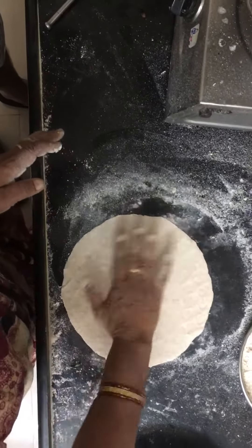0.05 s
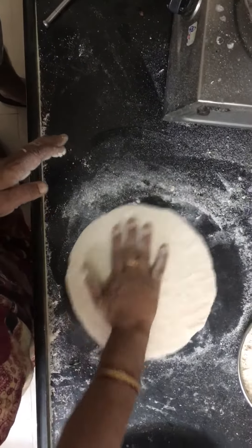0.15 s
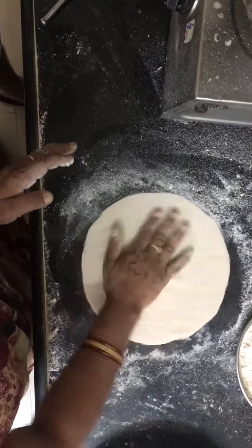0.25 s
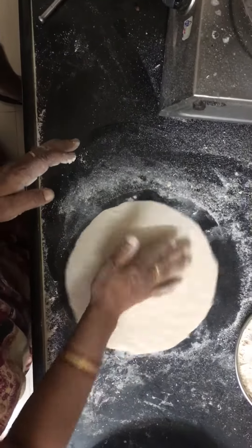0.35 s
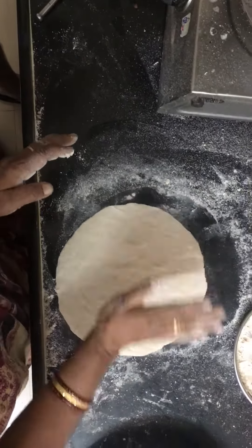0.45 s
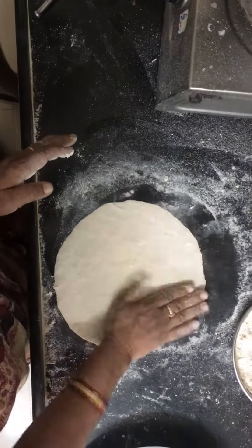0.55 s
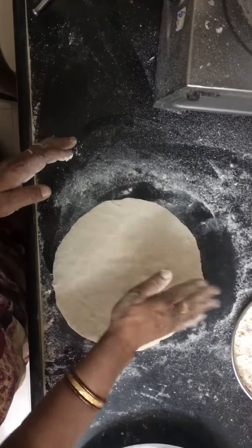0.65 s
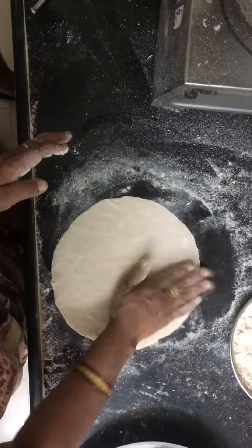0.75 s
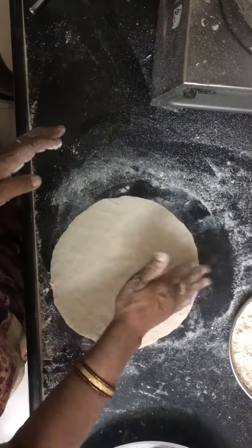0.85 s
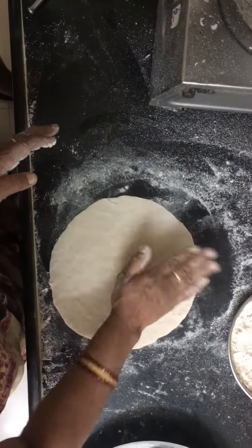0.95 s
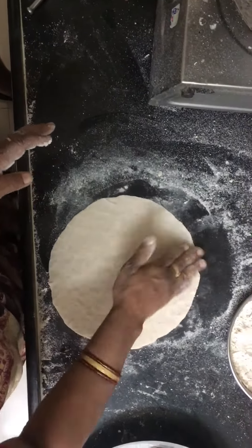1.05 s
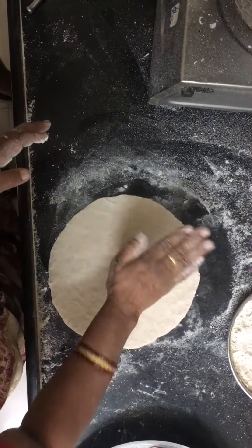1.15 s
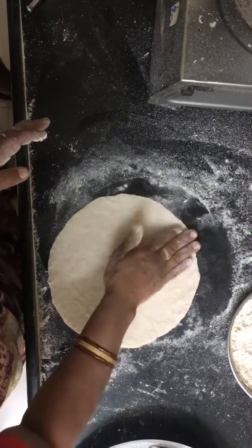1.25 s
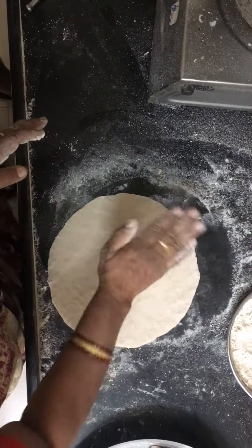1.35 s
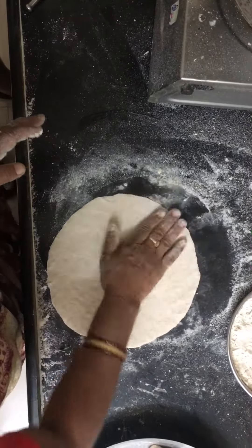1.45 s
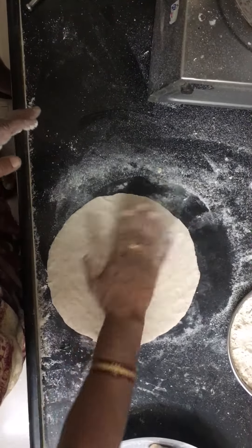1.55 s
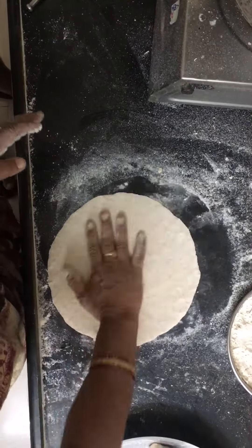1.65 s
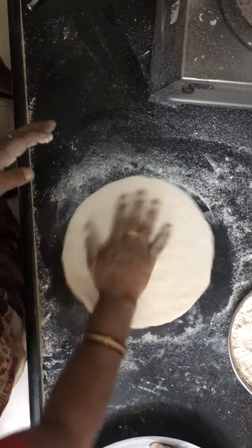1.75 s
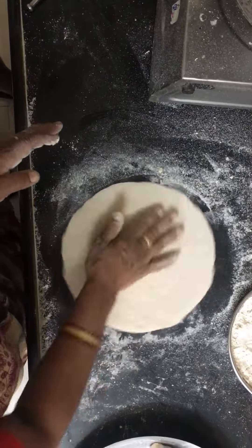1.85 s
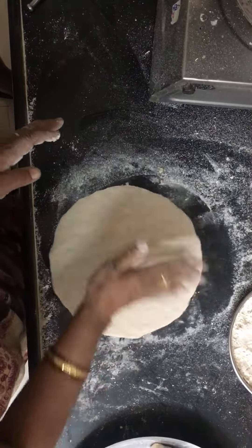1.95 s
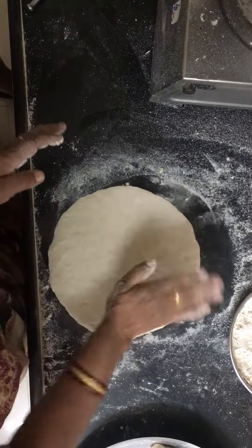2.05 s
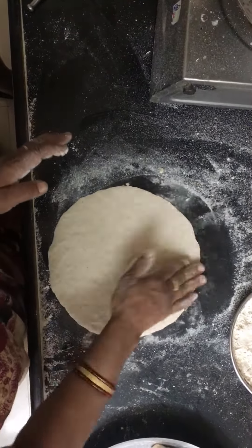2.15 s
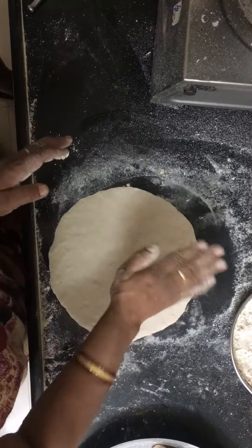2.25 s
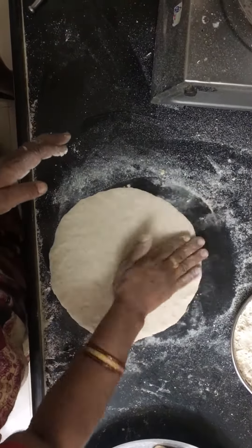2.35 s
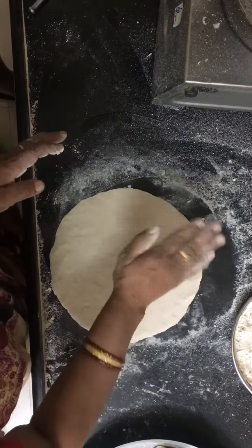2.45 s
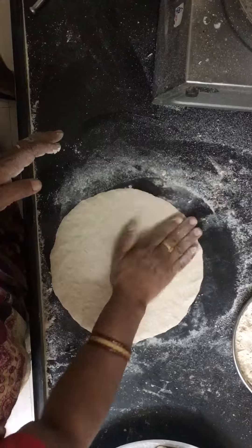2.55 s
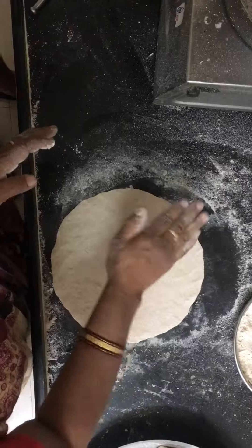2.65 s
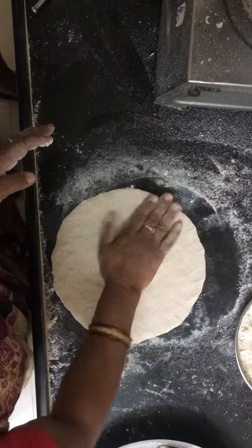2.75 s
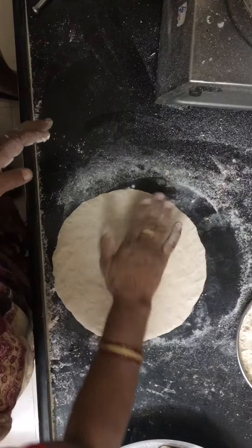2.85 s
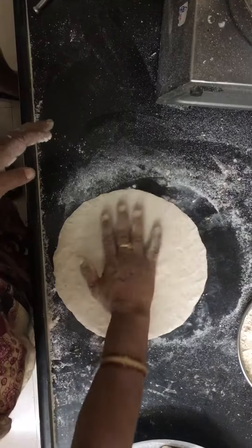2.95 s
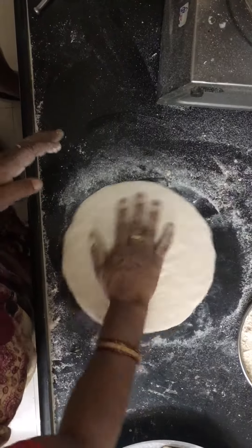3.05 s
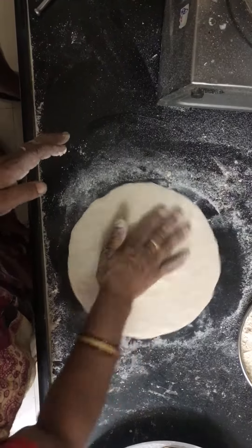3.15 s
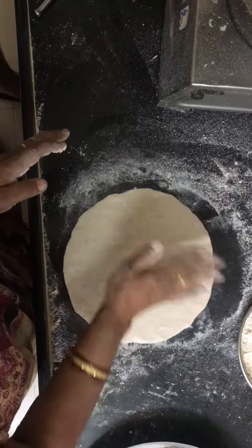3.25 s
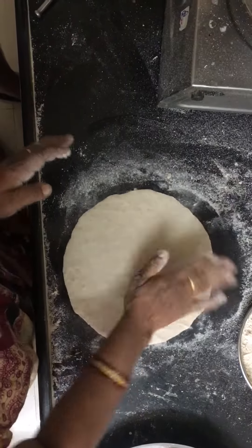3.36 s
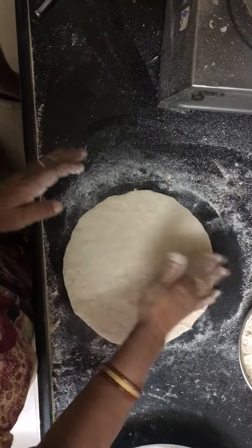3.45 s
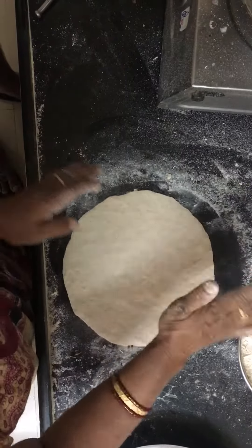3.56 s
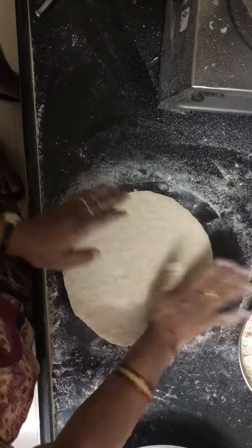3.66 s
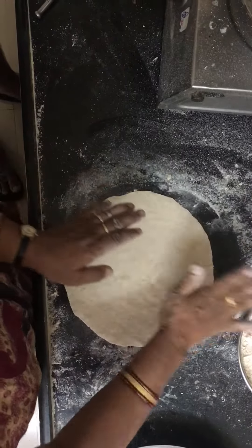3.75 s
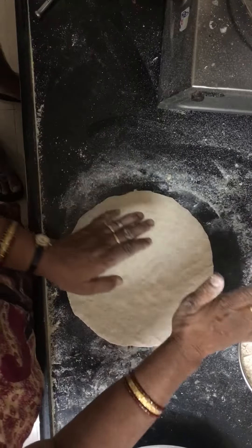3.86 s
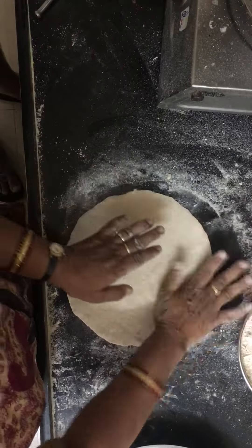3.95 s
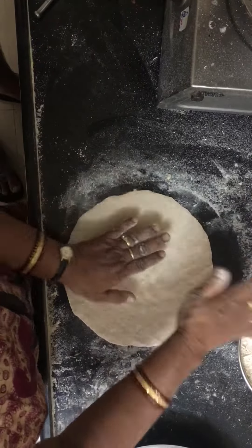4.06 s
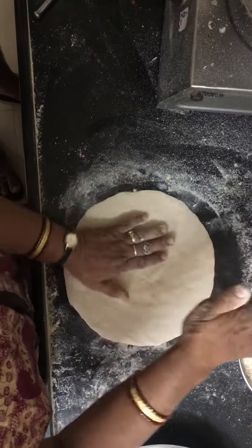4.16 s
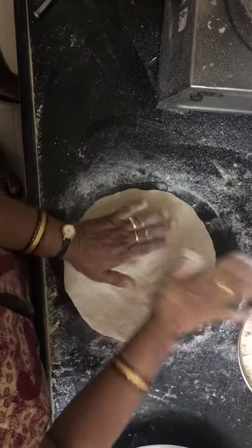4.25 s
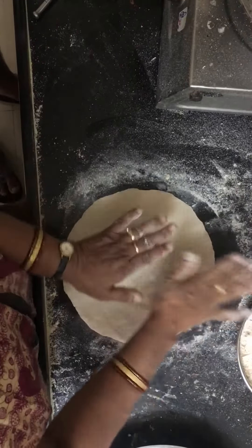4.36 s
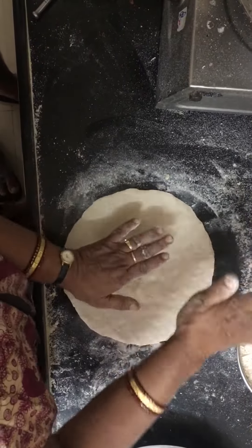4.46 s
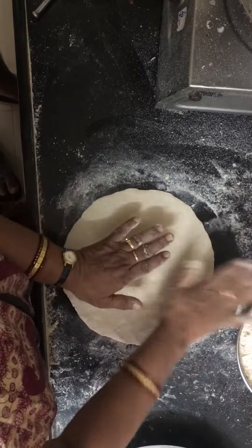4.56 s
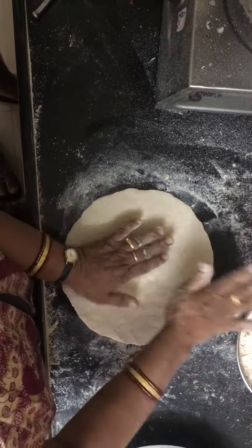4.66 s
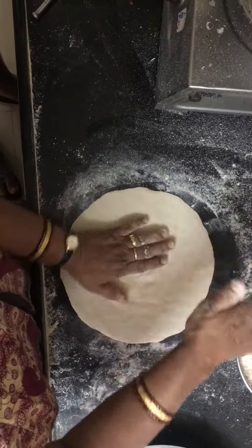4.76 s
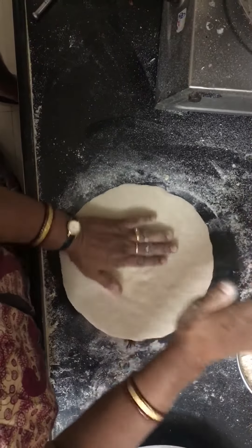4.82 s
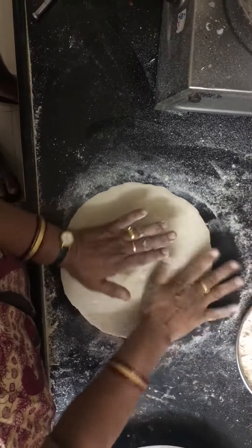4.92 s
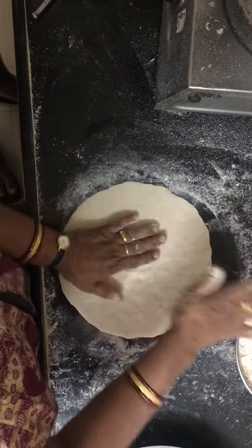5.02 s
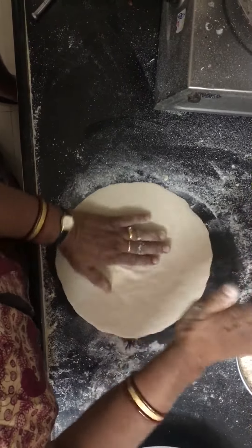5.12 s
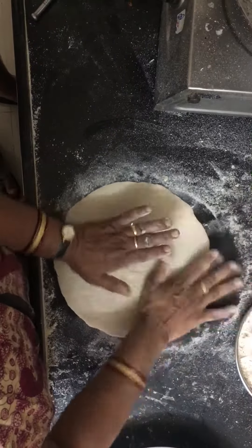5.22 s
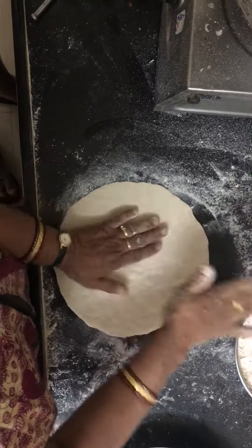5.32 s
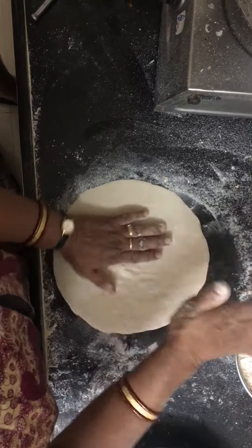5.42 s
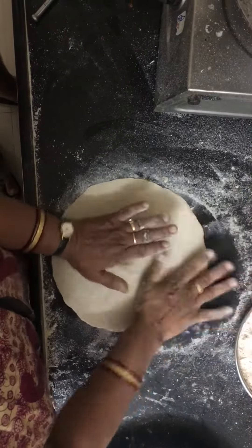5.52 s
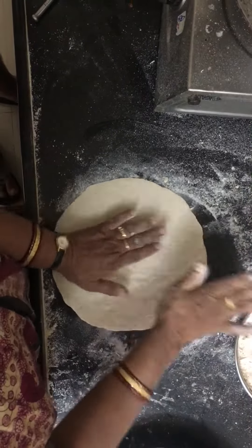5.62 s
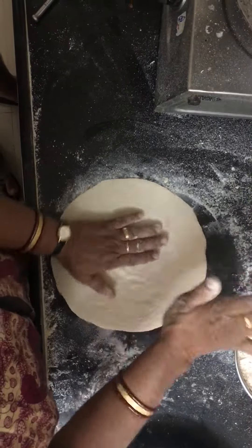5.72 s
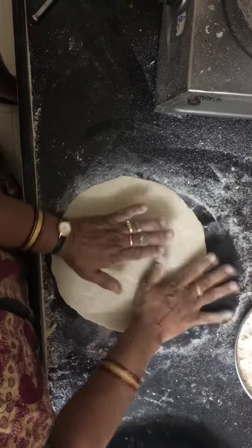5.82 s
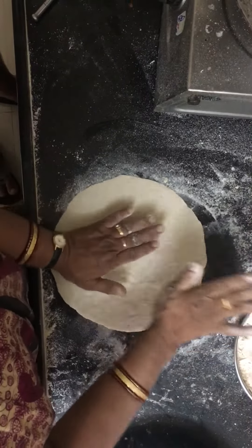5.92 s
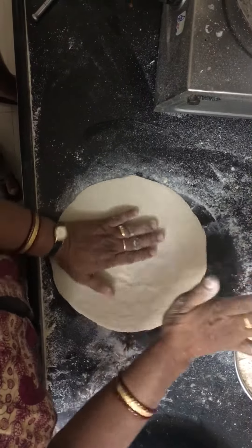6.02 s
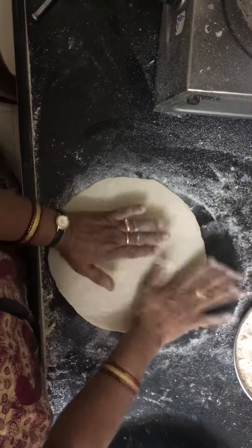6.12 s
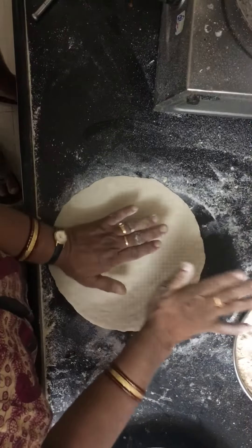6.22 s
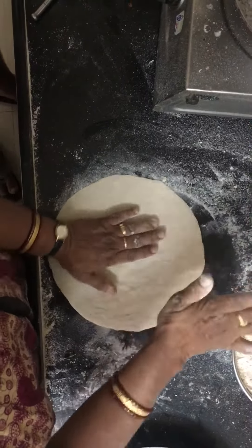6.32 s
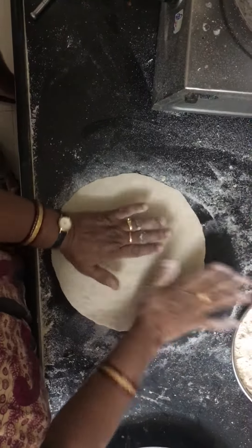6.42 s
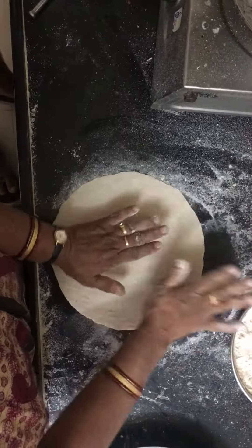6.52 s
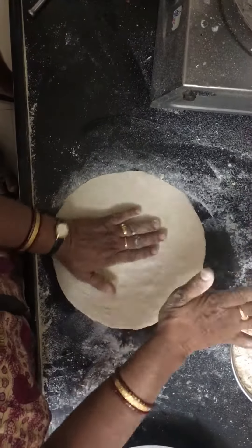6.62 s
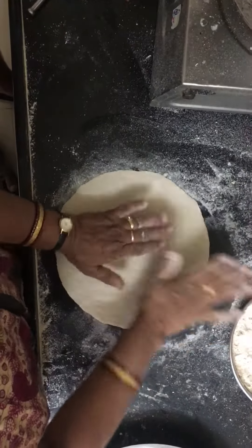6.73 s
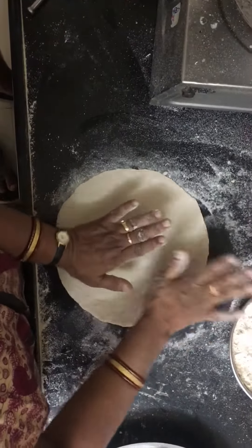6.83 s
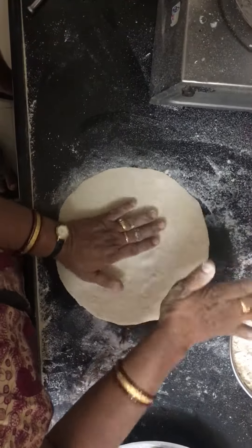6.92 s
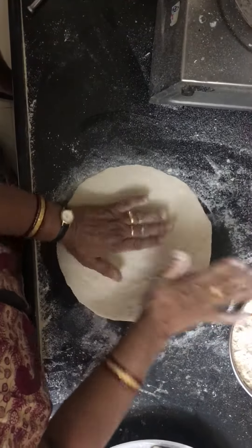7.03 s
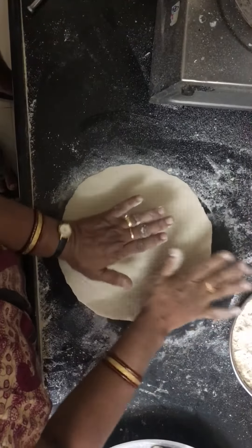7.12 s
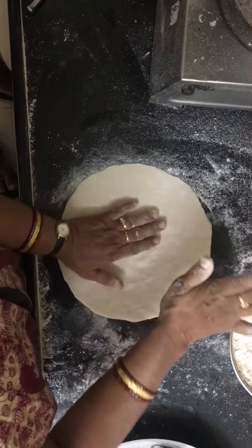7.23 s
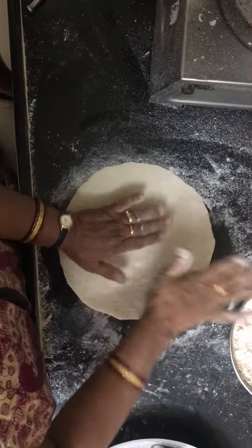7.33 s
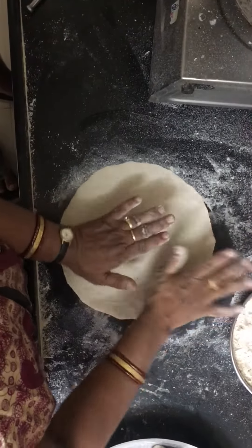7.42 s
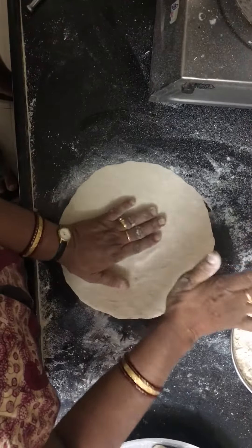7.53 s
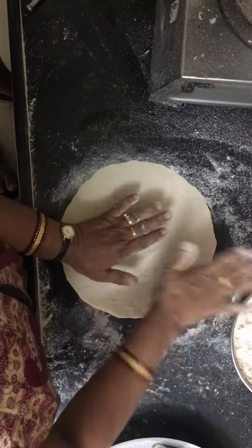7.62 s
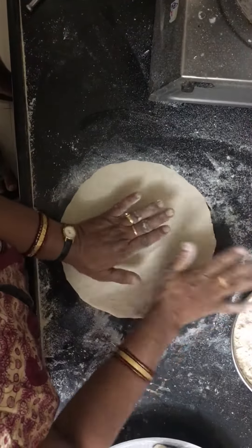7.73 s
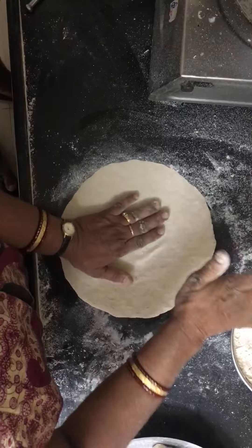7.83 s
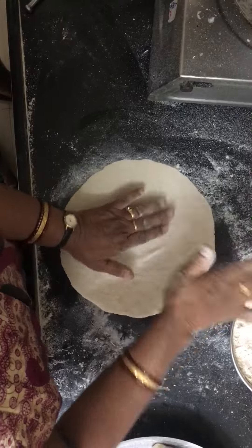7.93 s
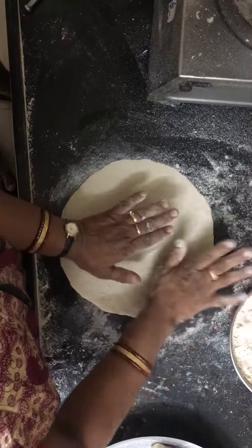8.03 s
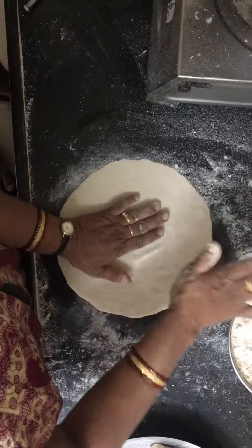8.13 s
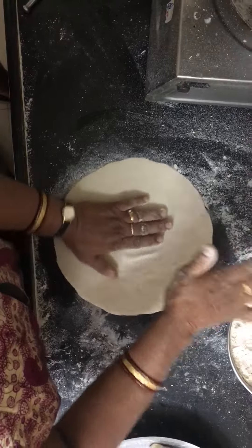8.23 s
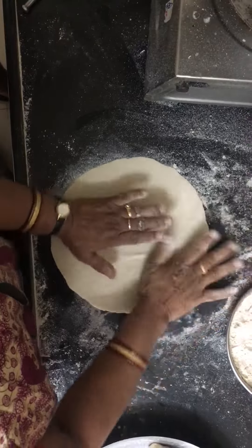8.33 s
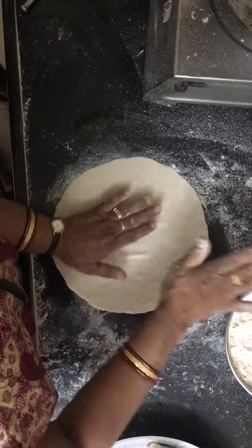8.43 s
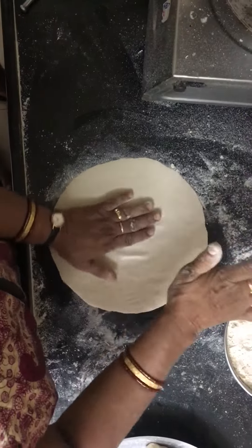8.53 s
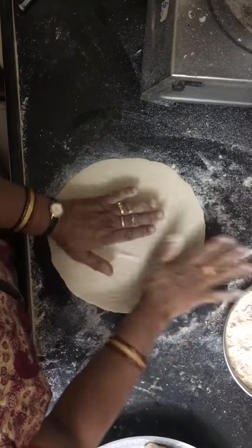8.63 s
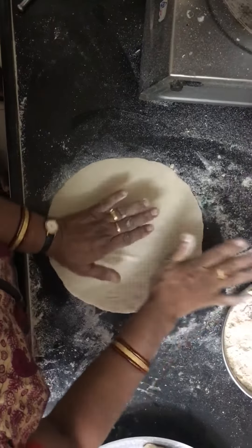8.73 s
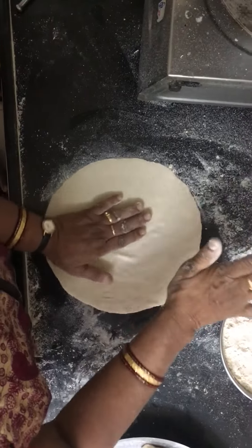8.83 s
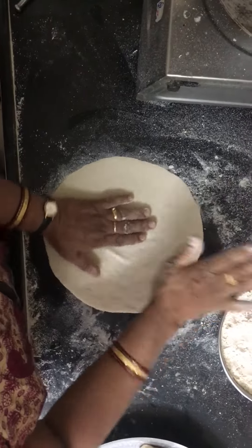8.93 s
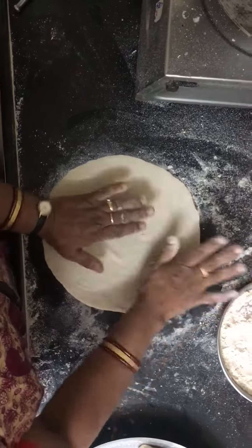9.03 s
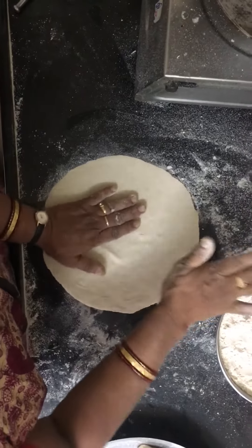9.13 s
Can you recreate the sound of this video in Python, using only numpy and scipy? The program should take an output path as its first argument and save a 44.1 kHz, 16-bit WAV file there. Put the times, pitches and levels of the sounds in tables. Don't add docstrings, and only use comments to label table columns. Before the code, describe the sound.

Close, sharp dough slaps with a short low boom in a small hard kitchen, soft flour hisses between, faint mains hum.

```python
import sys
import numpy as np
from scipy import signal
from scipy.fft import rfft, irfft, next_fast_len
from scipy.io import wavfile
from scipy.ndimage import uniform_filter1d

SR = 44100
rng = np.random.default_rng(int(sys.argv[2]) if len(sys.argv) > 2 else 0)


def linear_from_db(decibels):
    return 10 ** (np.asarray(decibels, float) / 20)


def output_pcm(signal):
    pcm = np.clip(np.atleast_2d(signal).T, -1, 1) * 32767
    wavfile.write(sys.argv[1], SR, np.round(pcm).astype(np.int16))


N = 404838
LEAD = 8192
LENGTH = next_fast_len(N + LEAD)

# frequency in Hz, level in dB per Hz.
AIR_SPECTRUM = [(120, -47), (180, 0.5), (340, -2.5), (500, -8.5), (620, -4.5), (900, -4.5), (1700, -11),
                (2600, -15), (5000, -23.5), (8000, -35), (13000, -37.5), (15800, -46)]
# frequency in Hz, level in dB.
HUM_TONES = [(50, -50.5), (100, -42), (260, -59.5), (300, -60), (349, -60), (598, -62)]
# frequency in Hz, width in Hz, level in dB.
DRONE_MODES = [(38, 8, -58), (61, 6, -52), (71, 5, -54), (90, 6, -48), (122, 7, -45), (143, 8, -49)]
# frequency in Hz, t60 in seconds.
KITCHEN_DECAY = [(250, 0.38), (600, 0.42), (1200, 0.44), (3000, 0.32), (7000, 0.3), (14000, 0.2)]
# delay in seconds, level in dB.
ECHO_BOUNCES = [(.0066, -9), (.0125, -15), (.0175, -12)]
# frequency in Hz, level in dB per Hz.
FLOUR_SPECTRUM = [(600, -20), (1000, -4.5), (1800, 6), (2600, 1.5), (3700, -0.5), (5200, -2.5),
                  (8000, -7.5), (12500, -7), (15800, -16)]
# start in seconds, length in seconds, hiss level in dB.
DOUGH_TURNS = [
    (0.168, 0.32, -51.5),
    (1.72, 0.3, -50.5),
    (3.052, 0.25, -51),
]
# fastest moment in seconds, hiss level in dB.
DOUGH_PUSHES = [(4.22, -62), (4.85, -58), (5.16, -60), (5.47, -61.5), (5.79, -60), (6.10, -60.5),
                (6.41, -61), (6.69, -62), (7.025, -61), (7.32, -64), (7.64, -74), (7.93, -66),
                (8.28, -61.5), (8.62, -62), (8.95, -60)]
# frequency in Hz, level in dB, t60 in seconds, first swing (1 up, -1 down).
BOOM_MODES = [(54, -20, .6, -1), (73.8, -11.4, .21, 1), (87.9, 0, .7, -1), (97, -3.3, .24, 1),
              (122.8, -15, .62, 1), (145.7, -17.7, .25, 1), (191, -23, .5, -1), (227.8, -17.6, .32, -1),
              (255.6, -13.1, .14, -1), (331.7, 5.1, .042, 1), (337.5, 4.2, .048, -1), (318, -25, .35, 1)]
# time in seconds, level in dB.
ARM_WEIGHT = [(-0.05, -31), (0.61, -22), (1.48, -26.5), (2.15, -22), (2.81, -25.5), (3.44, -23),
              (3.73, -15), (4.2, -17), (4.64, -15.5), (5.6, -15), (7.72, -14), (8.37, -17), (8.7, -17),
              (9.05, -19.5)]
# frequency in Hz, level in dB.
SKIN_COLOUR = [(200, -36), (330, -0.5), (410, -13.5), (530, -1), (640, -1), (900, -1), (1300, -3.5),
               (2000, -4), (3000, -8), (4200, -11), (6500, -18), (9500, -21), (14000, -30.5), (16300, -41)]
# start in seconds, level in dB, pitch in Hz.
FINGER_TOUCHES = [(0.1633, -26, 1540), (1.7138, -27.5, 1760), (3.0406, -33, 1650), (4.16, -36, 1380),
                  (6.629, -35, 2520), (6.9367, -28.5, 1910), (7.249, -34, 1310), (7.5565, -30.5, 2190),
                  (7.833, -31.5, 1390), (8.1588, -34.5, 2040), (8.515, -37, 1910), (8.8523, -37, 1650)]
# start in seconds, crack level in dB, palm fullness in dB,
# cupped palm pitch in Hz, finger gap pitch in Hz.
QUICK_PATS = [(-0.047, -7, 2, 1330, 3020), (0.609, -2.5, -5.5, 1460, 3420), (0.824, -5, -3, 1050, 3100),
              (1.044, -4, -3, 1730, 5440), (1.257, -5.5, 2, 2120, 6800), (1.478, -6, -8, 1100, 3530),
              (2.152, -3.5, -4, 950, 3950), (2.373, -1.5, 0.7, 1310, 3750), (2.592, -3.5, -0.5, 1160, 4470),
              (2.812, -5, -3, 1540, 3930), (3.444, -2, -2.5, 2170, 3680)]
# start in seconds, crack level in dB, palm fullness in dB,
# cupped palm pitch in Hz, finger gap pitch in Hz.
HEAVY_SLAPS = [(3.732, 1.5, 4, 1300, 4500), (4.005, 3.5, 5, 700, 2620), (4.356, 2.5, 5, 697, 4400),
               (4.638, 6, 1, 840, 6230), (4.976, 3.5, 2, 790, 2260), (5.283, 3.5, 2, 890, 4140),
               (5.58, 2.5, -0.5, 1570, 2970), (5.883, 0.2, -4, 2300, 5900), (6.192, 3, 2.4, 1510, 2720),
               (6.505, -0.2, -6, 2780, 4170), (6.811, -0.2, -3, 2380, 4260), (7.123, -0.7, 0.5, 2800, 5250),
               (7.425, -2.5, -3.5, 2070, 3370), (7.718, 3, 5, 790, 2200), (8.051, -1.5, 1.2, 1860, 4750),
               (8.372, 2, 5, 1350, 5350), (8.703, 0.5, 0, 1640, 12600), (9.045, 1, -8, 3200, 4900)]
# frequency in Hz, width in octaves, level in dB.
PHONE_DIPS = [(4880, 0.13, -4), (10490, 0.057, -5)]

HISS_EDGE_HZ = 15850
TURN_RISE_S, TURN_FALL_S, TURN_SAG_DB = 0.054, 0.088, -11.5
PUSH_RISE_S, PUSH_FALL_S = 0.047, 0.039
BOOM_LAG_S = 0.0043
MIDDLE_UNTIL_S, MIDDLE_KNOCK_DB, KNOCK_HZ = 3.6, 4, 110
RIPPLE_SHARE = 0.3
PALM_HZ, PALM_OCTAVES, PALM_DB = 653, 0.89, -2.5
FINGER_HZ, FINGER_OCTAVES, FINGER_TRADE = 3500, 0.65, 0.25
AIRY_HZ, AIRY_OCTAVES, AIRY_TRADE = 11400, 0.28, 0.1
CUP_DB, CUP_OCTAVES, CUP_WIDENS = 6, 0.13, 0.61
POCKET_DB, POCKET_OCTAVES = 5.5, 0.11
HOLLOW_DB, HOLLOW_RATIO = -1.5, 0.68
STING_HZ, SLAB_HZ = 7100, 394


def evened(x):
    return x / np.sqrt(np.mean(x ** 2) + 1e-20)


def read(points, hz):
    f, value = np.transpose(points)
    return np.interp(np.log(hz + 1), np.log(f + 1), value)


def add(mix, s, sound):
    part = mix[LEAD + round(s * SR):][:len(sound)]
    part += sound[:len(part)]


def bump(hz, centre_hz, octaves):
    return np.exp(-0.5 * (np.log2((hz + 1) / centre_hz) / octaves) ** 2)


def causal(gain_db):
    log_gain = np.log(linear_from_db(np.r_[gain_db, gain_db[-2:0:-1]]))
    phase = -signal.hilbert(log_gain).imag
    return np.fft.ifft(np.exp(log_gain + 1j * phase)).real[:1024]


def noise(points, lo_hz, hi_hz):
    hz = np.fft.rfftfreq(LENGTH, 1 / SR)
    z = rfft(rng.standard_normal(LENGTH)) * linear_from_db(read(points, hz)) * (hz < HISS_EDGE_HZ)
    in_band = irfft(z * (hz > lo_hz) * (hz < hi_hz), LENGTH)
    return irfft(z, LENGTH) / np.std(in_band)


def wander(hz):
    smooth = signal.butter(2, hz, fs=SR, output="sos")
    return evened(signal.sosfiltfilt(smooth, rng.standard_normal(LENGTH)))


def room_air():
    air = linear_from_db(-48.5 + 0.49 * wander(0.33)) * noise(AIR_SPECTRUM, 480, 15000)
    low_band = signal.butter(3, [80, 150], "band", fs=SR, output="sos")
    rumble = evened(signal.sosfilt(low_band, rng.standard_normal(LENGTH)))
    return air + linear_from_db(-47.5) * rumble


def hum():
    t, out = np.arange(LENGTH) / SR, np.zeros(LENGTH)
    for hz, db in HUM_TONES:
        cycles = hz * t + 0.06 * wander(4) + rng.random()
        out += np.sqrt(2) * linear_from_db(db + 3 * wander(12)) * np.sin(2 * np.pi * cycles)
    return out


def drone():
    t, out = np.arange(LENGTH) / SR, np.zeros(LENGTH)
    for hz, width, db in DRONE_MODES:
        angle = 2 * np.pi * hz * t
        out += linear_from_db(db) * (wander(width) * np.cos(angle) + wander(width) * np.sin(angle))
    return out


def tail():
    taps, at = np.zeros(16000), np.arange(130, 15980, 8)
    taps[at + rng.integers(0, 8, len(at))] = rng.choice([-1., 1.], len(at))
    hz, t, z = signal.stft(taps, SR, nperseg=256)
    decay = linear_from_db(-60 * t / read(KITCHEN_DECAY, hz)[:, None])
    out = signal.istft(z * decay * (hz < HISS_EDGE_HZ)[:, None], SR, nperseg=256)[1][:16000]
    return out / np.linalg.norm(out)


def kitchen(x, tail_db):
    return x + linear_from_db(tail_db) * signal.fftconvolve(x, tail())[:LENGTH]


def turning():
    t, level = (np.arange(LENGTH) - LEAD) / SR, np.zeros(LENGTH)
    for s, length, db in DOUGH_TURNS:
        moving = np.clip(np.minimum((t - s) / TURN_RISE_S, (s + length - t) / TURN_FALL_S), 0, 1)
        level += moving * linear_from_db(db + TURN_SAG_DB * np.clip((t - s) / length, 0, 1))
    for s, db in DOUGH_PUSHES:
        spread_s = np.where(t < s, PUSH_RISE_S, PUSH_FALL_S)
        level += linear_from_db(db) * np.exp(-0.5 * ((t - s) / spread_s) ** 2)
    grain = linear_from_db(1.4 * wander(150) + 0.99 * wander(900) + 0.54 * wander(25))
    return level * grain * noise(FLOUR_SPECTRUM, 9500, 17400)


def boom(blows):
    t = np.arange(SR) / SR
    rings = np.array([way * linear_from_db(db - 60 * t / t60) * np.sin(2 * np.pi * hz * t)
                      for hz, db, t60, way in BOOM_MODES])
    upper = np.array(BOOM_MODES)[:, 0] > KNOCK_HZ
    early = np.arange(LENGTH) < LEAD + MIDDLE_UNTIL_S * SR
    low = signal.fftconvolve(blows, ~upper @ rings)
    high = signal.fftconvolve(blows * linear_from_db(MIDDLE_KNOCK_DB * early), upper @ rings)
    return (low + high)[:LENGTH]


def contacts(peak_s, spread_s):
    t = np.arange(600) / SR
    clicks = rng.standard_normal(600) * linear_from_db(2.63 * rng.exponential(1, 600))
    palm = np.exp(-0.5 * ((t - peak_s) / spread_s) ** 2)
    fingertips = linear_from_db(-17) * (t < peak_s)
    burst = clicks * (palm + fingertips) * np.minimum(t / 0.00029, 1)
    z = rfft(burst, 2048)
    z = z / np.sqrt(uniform_filter1d(abs(z) ** 2, size=40))
    burst = irfft(z, 2048)[:600]
    return burst / np.linalg.norm(burst)


def crack(colour_db, tail_db, landing_s):
    burst = contacts(peak_s=landing_s, spread_s=0.0011)
    ripple = np.fft.fftshift(irfft(abs(rfft(burst, 1024)) ** RIPPLE_SHARE))
    ripple = ripple / np.linalg.norm(ripple)
    out = linear_from_db(tail_db) * signal.fftconvolve(np.roll(tail(), 100), ripple, "same")
    burst = signal.lfilter([1.15, -0.3], [1], burst)
    out[round(0.001 * SR):][:600] += linear_from_db(0.15) * burst
    dulled = signal.lfilter([1, 1], [2], burst)
    for k, (s, db) in enumerate(ECHO_BOUNCES, 1):
        out[round(s * SR):][:600] += (-1) ** k * linear_from_db(db) * dulled
    colour = causal(colour_db)
    return signal.fftconvolve(out, colour / np.linalg.norm(colour))


def touches():
    hz, out = np.fft.rfftfreq(4096, 1 / SR), np.zeros(LENGTH)
    for s, db, pitch_hz in FINGER_TOUCHES:
        colour_db = read(FLOUR_SPECTRUM, hz) + 8 * bump(hz, pitch_hz, 0.47)
        colour_db += -9 * bump(hz, 12300, 0.58) - 30 * (hz > HISS_EDGE_HZ)
        add(out, s - 0.003, linear_from_db(db + 19.5) * crack(colour_db, tail_db=-6.0, landing_s=0.004))
    return out


def hand_colour(palm_db, cup_hz, pocket_hz, sting_db, knock_db):
    hz = np.fft.rfftfreq(4096, 1 / SR)
    colour_db = read(SKIN_COLOUR, hz)
    colour_db += (PALM_DB + palm_db) * bump(hz, PALM_HZ, PALM_OCTAVES)
    colour_db -= FINGER_TRADE * palm_db * bump(hz, FINGER_HZ, FINGER_OCTAVES)
    colour_db -= AIRY_TRADE * palm_db * bump(hz, AIRY_HZ, AIRY_OCTAVES)
    cup_octaves = CUP_OCTAVES * max(1500 / cup_hz, 1) ** CUP_WIDENS
    colour_db += CUP_DB * bump(hz, cup_hz, cup_octaves)
    colour_db += POCKET_DB * bump(hz, pocket_hz, POCKET_OCTAVES)
    colour_db += HOLLOW_DB * bump(hz, HOLLOW_RATIO * pocket_hz, POCKET_OCTAVES)
    return colour_db + sting_db * bump(hz, STING_HZ, 1.0) + knock_db * bump(hz, SLAB_HZ, 0.2)


def slapping(rows, tail_db, sting_db, knock_db, landing_s):
    cracks, blows = np.zeros(LENGTH), np.zeros(LENGTH)
    for s, db, palm_db, cup_hz, pocket_hz in rows:
        colour_db = hand_colour(palm_db, cup_hz, pocket_hz, sting_db, knock_db)
        add(cracks, s + 0.0005, linear_from_db(db + 12) * crack(colour_db, tail_db, landing_s))
        weight_db = np.interp(s, *np.transpose(ARM_WEIGHT))
        add(blows, s + BOOM_LAG_S, linear_from_db([weight_db + 3]))
    return cracks, blows


def scene():
    mix = room_air() + hum() + drone()
    mix += linear_from_db(2.5) * kitchen(turning(), tail_db=-8) + touches()
    pats, pat_blows = slapping(QUICK_PATS, tail_db=-3.5, sting_db=-3, knock_db=8.5, landing_s=0.0028)
    slaps, slap_blows = slapping(HEAVY_SLAPS, tail_db=-5, sting_db=-1.7, knock_db=-0.5, landing_s=0.0035)
    mix += pats + slaps + boom(pat_blows + slap_blows)
    return mix[None, LEAD:LEAD + N]


def top_cut(x):
    return signal.sosfilt(signal.butter(12, 16810, fs=SR, output="sos"), x)


def record(dry):
    hz = np.fft.rfftfreq(N, 1 / SR)
    colour = linear_from_db(sum(db * bump(hz, f, octaves) for f, octaves, db in PHONE_DIPS))
    colour = colour * hz ** 4 / (hz ** 4 + 36 ** 4)
    capped = np.clip(irfft(rfft(dry) * colour, N), -0.95, 0.95)
    band = signal.firwin(255, 16500, fs=SR, window=("kaiser", 10))[None]
    mix = signal.oaconvolve(capped, band, "same")
    return top_cut(mix)


dry = scene()
out = record(dry)
output_pcm(out)
```